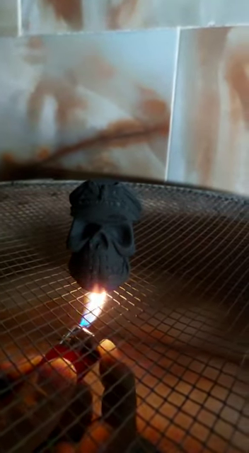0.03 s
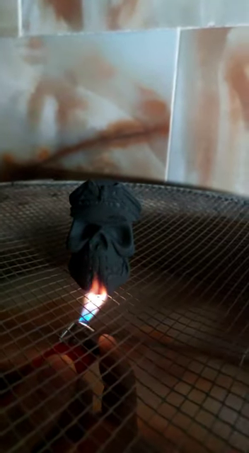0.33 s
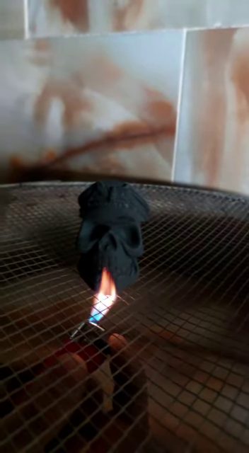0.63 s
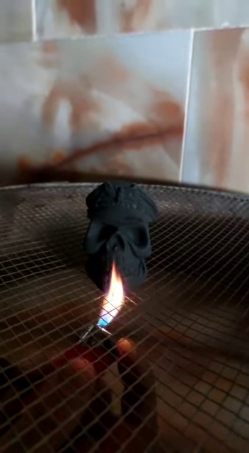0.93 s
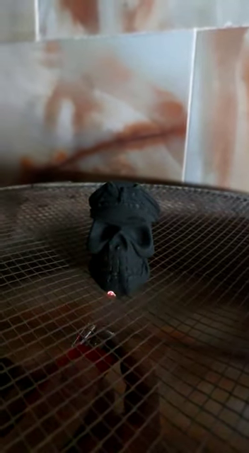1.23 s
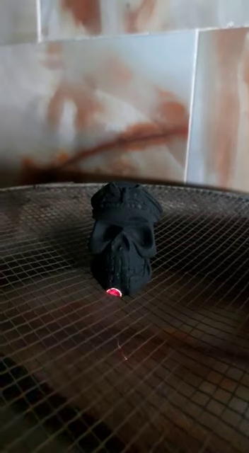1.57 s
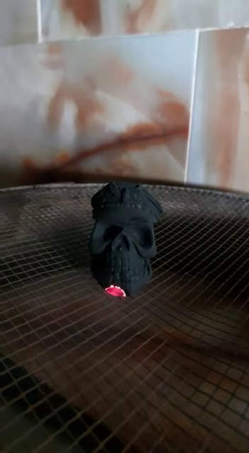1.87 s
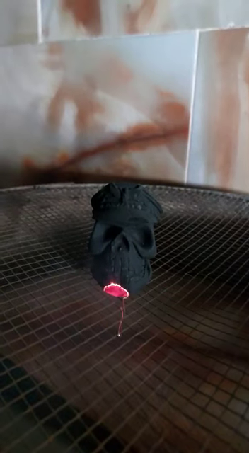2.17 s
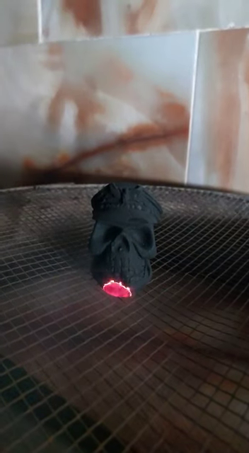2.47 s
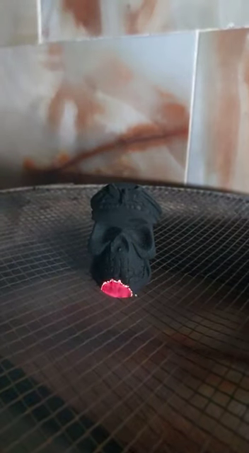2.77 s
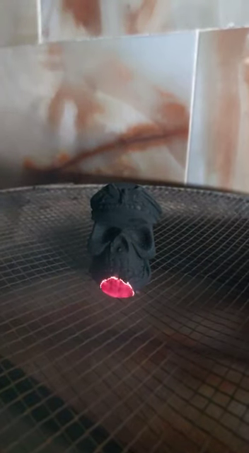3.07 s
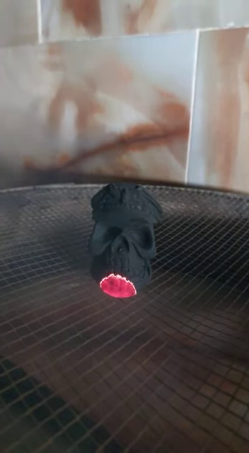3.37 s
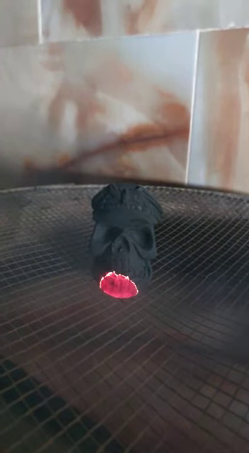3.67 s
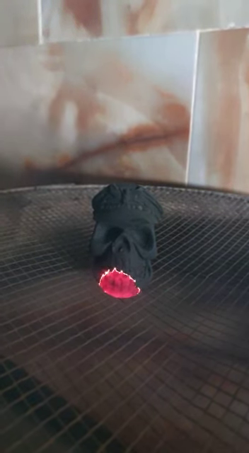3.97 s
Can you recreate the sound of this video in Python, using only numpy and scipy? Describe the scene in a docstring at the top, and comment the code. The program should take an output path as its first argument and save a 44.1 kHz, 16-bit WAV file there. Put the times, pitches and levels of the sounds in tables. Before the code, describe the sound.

Charcoal fizzes and crackles on a wire grill, catching after a jet lighter hisses softly for a second. A sharp crack, a whizzing spark and soft gas spurts come through the sizzle, close up indoors over low rumble.

```python
"""Indoors, two microphones close to a self-lighting charcoal on a wire grill, over a low room rumble.
A jet lighter hisses against the coal, which ticks once. After a second the coal catches, the lighter
stops and a glowing front fizzes across it with tiny crackles. One sharp crack follows, then a spark
whizzes away. Soft spurts of gas come through the fizz, and a smaller crack sounds near the end."""
import sys
import numpy as np
from scipy import signal
from scipy.fft import rfft, irfft
from scipy.io import wavfile

SR = 44100
rng = np.random.default_rng(int(sys.argv[2]) if len(sys.argv) > 2 else 0)


def transcribe(signal):
    """Save signal, clipped to [-1, 1], as a 16-bit WAV file at the path in sys.argv[1]."""
    frames = np.atleast_2d(signal).T
    limited = np.clip(frames, -1, 1)
    pcm = np.round(limited * 32767).astype(np.int16)
    wavfile.write(sys.argv[1], SR, pcm)


N = 176400
T = np.arange(N) / SR
HZ = np.maximum(np.arange(N // 2 + 1) * SR / N, 1)

# Echoes off the grill bowl. Each row: delay in seconds, relative level in dB.
BOWL_ECHOES = [(.00195, -24.5), (.002608, -24), (.00342, -27), (.00668, -20), (.00744, -30.5)]


def from_db(db):
    """Decibels to gain."""
    return 10 ** (np.asarray(db) / 20)


def rms_one(x):
    """Scale to unit rms."""
    return x / np.sqrt(np.mean(x ** 2) + 1e-20)


def in_time(rows):
    """The columns of a curve at every sample."""
    seconds, *columns = np.transpose(rows)
    return [np.interp(T, seconds, column) for column in columns]


def at_hz(rows):
    """The columns of a spectrum at every frequency."""
    hz, *columns = np.transpose(rows)
    return np.array([np.interp(np.log(HZ), np.log(hz), column) for column in columns])


def colour(x, rows):
    """Filter by a spectrum, falling steeply below its first point; unit rms."""
    low_cut = 1 / np.sqrt(1 + (.8 * rows[0][0] / HZ) ** 8)
    return rms_one(irfft(rfft(x) * from_db(at_hz(rows)) * low_cut, N))


def band(x, hz, kind):
    """Butterworth filter; unit rms."""
    sos = signal.butter(2, np.clip(hz, 10, .45 * SR), kind, fs=SR, output="sos")
    return rms_one(signal.sosfilt(sos, x))


def noise():
    """White noise."""
    return rng.standard_normal(N)


def drift(hz):
    """A random wander, mostly slower than hz; unit rms."""
    return rms_one(irfft(rfft(noise()) / (1 + (HZ / hz) ** 2), N))


def swell(peak_s, width_s, db):
    """A bell-shaped rise and fall."""
    return from_db(db) * np.exp(-.5 * np.clip((T - peak_s) / width_s, -10, 10) ** 2)


def grains(per_s, spread_db):
    """Random clicks of uneven size; unit rms."""
    sizes = from_db(spread_db * np.minimum(rng.exponential(1, N), 4)) * rng.choice([-1, 1], N)
    return rms_one(sizes * (rng.random(N) < per_s / SR))


def at_mics(direct):
    """Direct sound meets the two microphones out of step, the bass in step; scatter is unrelated in each."""
    # Each row: frequency in Hz, share of the power common to both microphones.
    likeness = [(100, .98), (300, .87), (550, .78), (1050, .08), (1450, .55), (1850, .15), (2200, .68),
                (3500, .68), (4600, .3), (5600, .64), (7000, .44), (9800, .24), (12000, .48), (16000, .18)]
    # Each row: frequency in Hz, phase lead of the left microphone in radians.
    left_lead = [(550, 0), (950, -1.9), (1550, -3), (2000, .7), (3000, 3.1), (3700, 3.6), (4100, 5.5),
                 (5000, 4.5), (5600, 6.1), (6800, 7.8), (7900, 7.2), (9200, 9.6), (12400, 18.2),
                 (13300, 19.2), (16000, 25)]
    alike = np.clip(at_hz(likeness), 0, .99)
    lead = np.interp(HZ, *np.transpose(left_lead)) * np.minimum(HZ / 600, 1) ** 2
    turn = np.exp(.5j * lead * np.array([[1], [-1]]))
    scattered = rfft([noise(), noise()])
    return irfft(np.sqrt(alike) * turn * rfft(direct) + np.sqrt(1 - alike) * scattered, N)


def room_rumble():
    """The low, steady rumble of the room around the grill."""
    # Each row: frequency in Hz, relative level in dB.
    spectrum = [(13, -41), (22, -31), (43, -5.5), (95, -2), (116, -12), (131, -2.5), (144, 3), (158, -7),
                (178, -10.5), (222, -15), (292, -11.5), (494, -34.5), (600, -30.5), (780, -71),
                (1320, -120)]
    return from_db(-63.5) * colour(at_mics(noise()), spectrum)


def jet_lighter():
    """A steady jet of gas that thins briefly before the thumb lets go."""
    # Each row: frequency in Hz, relative level at the left and right microphones in dB.
    spectrum = [(560, -11.5, -14.5), (1130, -15.5, -17), (1660, -16, -13.5), (2240, -7.5, -13),
                (2720, -2.5, -15), (3230, -1.5, 1), (3400, 4, 0.5), (3770, -2.5, -3.5), (5070, -6.5, -9.5),
                (7640, -8.5, -10.5), (9600, -16, -13), (11200, -8, -15), (15000, -19, -21)]
    off_s, release_s = 1.16, 0.015
    start_db, rise_db_per_s = -67.5, 0.5
    held = np.clip((off_s - T) / release_s, 0, 1)
    jet = colour(at_mics(noise()), spectrum)
    lows = irfft(rfft(jet) / (1 + (HZ / 2900) ** 8), N)
    thinning = 0.64 * swell(peak_s=0.96, width_s=0.044, db=0)
    level_db = start_db + rise_db_per_s * T + .5 * drift(hz=6.3)
    return held * from_db(level_db) * (jet - thinning * lows)


def coal_cracks():
    """Each crack is a ringing chip and a snap, both echoed by the bowl, over a dull thud."""
    # Each row: start in seconds, level in dB, pitch of the chip in Hz, then ring, snap and thud trims in dB.
    cracks = [(0.1558, -45, 12000, -8, -6, -34), (1.131, -50, 4170, -2, -3, -13),
              (1.314, -41, 6500, -8, -3, -16), (1.5483, -15.5, 11100, -0.5, -4, -40),
              (1.5507, -25, 11000, 0, -3, -30), (1.641, -37, 11700, -11, -5, -17),
              (1.919, -36, 12000, -5, -2, -34), (3.6037, -28, 5720, 4, 2.5, -14),
              (3.6062, -32, 5400, 2, 0, -4)]
    # Each row: frequency in Hz, relative level in dB.
    snap_spectrum = [(1000, -39), (2100, 3.5), (3000, -4.5), (4200, -3), (5400, -3), (7000, 7), (9000, 4),
                     (12000, 5.5), (16000, -12)]
    echo_boost_db, tail_db, tail_t60_s, pan_db = 10, -6.5, 0.1, 0.5

    def decay(start_s, db, t60_s):
        return (T > start_s) * from_db(np.maximum(db - 60 * np.maximum(T - start_s, 0) / t60_s, -300))

    snap = colour(at_mics(noise()), snap_spectrum)
    thud = band(at_mics(noise()), [250, 1800], "band")
    direct, thuds = np.zeros((2, N)), np.zeros((2, N))
    for start_s, db, hz, ring_db, snap_db, thud_db in cracks:
        chip = np.sin(2 * np.pi * hz * (T - start_s) + np.array([[1], [0]]))  # left leads by a radian
        direct += chip * decay(start_s, db + ring_db, t60_s=0.0061)
        direct += .5 * snap * decay(start_s, db + snap_db, t60_s=0.012)
        thuds += thud * decay(start_s, db + thud_db, t60_s=0.078)
    echoes = sum(from_db(db + echo_boost_db) * np.roll(direct, int(delay_s * SR), axis=1)
                 for delay_s, db in BOWL_ECHOES)
    scatter = rng.standard_normal((2, SR // 4)) * from_db(-60 * T[:SR // 4] / tail_t60_s)
    scatter = band(scatter, 7000, "low")
    tail = signal.fftconvolve(direct, scatter / np.linalg.norm(scatter[0]), axes=1)[:, :N]
    return (direct + echoes + from_db(tail_db) * tail) * from_db([[pan_db], [-pan_db]]) + thuds


def gas_spurts():
    """Flame and pockets of gas flare in short puffs, broad and soft or narrow and spitting."""
    # Each row: peak time and width in seconds, level in dB, centre in Hz, bandwidth in octaves.
    spurts = [(.335, 0.041, -75, 1220, 2), (.395, 0.013, -60, 110, 1.7), (.74, 0.23, -78, 1500, 2.1),
              (.84, 0.049, -56, 91, 1.6), (1.14, 0.014, -59.5, 1820, 2.8), (1.207, 0.016, -49.5, 127, 1.27),
              (1.204, 0.013, -57, 593, 2), (1.868, 0.043, -54.5, 770, 1.5), (2.5696, 0.004, -39, 1000, 2.6),
              (2.572, 0.0054, -45, 1770, 0.23), (2.588, 0.0077, -45.5, 310, 1.3),
              (2.588, 0.0099, -46.5, 1280, 1.9), (2.6125, 0.0031, -36, 530, 1.26),
              (2.625, 0.015, -40.5, 313, 1.3), (2.623, 0.0097, -44, 910, 1.7),
              (2.645, 0.023, -46.5, 560, 2.8), (2.886, 0.031, -48.5, 206, 1.8),
              (3.12, 0.027, -55, 271, 1.2), (3.495, 0.018, -54, 257, 2.1), (3.538, 0.028, -45.5, 1300, 3.5),
              (3.58, 0.11, -58, 250, 2), (3.606, 0.0028, -50, 1500, 2.6), (3.621, 0.028, -49.5, 616, 5),
              (3.72, 0.13, -53.5, 68, 1.02)]
    air, out = at_mics(noise()), np.zeros((2, N))
    for peak_s, width_s, db, hz, octaves in spurts:
        edges = hz * 2 ** (octaves * np.array([-.5, .5]))
        puff = band(band(air, edges, "band"), edges, "band")
        out += puff * swell(peak_s, width_s, db)
    return out


def burning_coal():
    """Countless tiny bursts fizz over rushing gas and a low draught; some stand out as crackles."""
    # Each row: frequency in Hz, relative level at the left and right microphones in dB.
    spectrum = [(220, -8, -6.5), (319, -2.5, -6), (531, 0.5, -2.5), (700, -10.5, -6.5), (880, -1.5, -8),
                (1164, -4, 0.5), (1326, -6, -7), (1740, -5, -10), (1960, -3.5, -5.5), (3000, -2, -2.5),
                (3870, -4.5, -3), (4700, -4, -9.5), (5450, -5.5, -3.5), (7660, -3, -9), (8700, -12.5, -8.5),
                (10230, -5.5, -19), (12200, -4.5, -7), (16000, -8.5, -25)]
    # Each row: frequency in Hz, relative level in dB.
    draught_spectrum = [(25, -19), (50, -4.5), (72, 5), (105, -2.5), (130, 5.5), (155, -10.5), (180, -7),
                        (260, -18), (400, -23)]
    # Vigour of the fizzing front and of the gas. Each row: time in seconds, relative level in dB.
    fizz_curve = [(1.04, -53), (1.12, -62.5), (1.17, -58.5), (1.24, -56), (1.31, -52), (1.45, -53.5),
                  (1.65, -53.5), (1.95, -50), (2.2, -46.5), (2.37, -51.5), (2.48, -46), (2.56, -49),
                  (2.78, -51.5), (2.94, -49), (3.24, -50.5), (3.42, -49), (3.58, -46.8), (3.8, -49.5),
                  (4, -48)]
    gas_curve = [(1.04, -80), (1.16, -62.5), (1.36, -56), (1.55, -55.5), (1.8, -50), (1.98, -49.5),
                 (2.25, -51.5), (2.55, -48.5), (2.72, -51.5), (2.9, -48.5), (3.22, -51.5), (3.5, -48.5),
                 (3.75, -53.5), (4, -49.5)]
    # Bright flares of the fizz. Each row: peak time and width in seconds, level in dB.
    flare_swells = [(1.34, 0.027, -63), (2.215, 0.052, -50.5), (2.47, 0.024, -48), (2.67, 0.018, -53),
                    (3.18, 0.04, -51), (3.6, 0.028, -48), (3.96, 0.022, -54)]
    catch_s, rise_s = 1.05, 0.11
    split_hz, flutter_hz, burst_share = 2140, 4.8, 0.28
    fizz_trim_db, gas_trim_db = 1.45, -1.44
    (fizz_db,), (gas_db,) = in_time(fizz_curve), in_time(gas_curve)

    bursts = np.array([grains(per_s=5000, spread_db=4.5) for _ in range(2)])
    smooth = at_mics(noise())
    grainy = at_mics(bursts[0]) + .5 * bursts[::-1]
    hiss = colour(np.sqrt(1 - burst_share) * smooth + np.sqrt(burst_share) * grainy, spectrum)
    crackle = from_db(-23) * colour(grains(per_s=14, spread_db=5.5), spectrum)
    fizz = band(hiss + crackle, split_hz, "high")
    fizz *= from_db(fizz_trim_db + fizz_db + 1.48 * drift(flutter_hz))

    rush = colour(at_mics(noise()), spectrum)
    gas = band(rush, split_hz, "low") * from_db(gas_trim_db + gas_db + 1.5 * drift(flutter_hz))
    flares = band(rush, 8500, "high") * sum(swell(*row) for row in flare_swells)
    draught = colour(at_mics(noise()), draught_spectrum)
    draught *= from_db(-55 + gas_db - np.median(gas_db) + 2 * drift(hz=25))  # follows the gas
    alight = np.clip((T - catch_s) / rise_s, 0, 1)
    return alight * (fizz + gas + flares + draught)


def flying_spark():
    """A flying ember sputters: a broken, raspy whistle that rises and falls."""
    # Each row: time in seconds, pitch in Hz, level in dB.
    flight = [(1.89, 1561, -60), (1.914, 1702, -48), (1.928, 1825, -60), (1.941, 2196, -52),
              (1.952, 2000, -72), (1.995, 1800, -59), (2.011, 1840, -45), (2.025, 1926, -54),
              (2.032, 1487, -54), (2.044, 1383, -46), (2.054, 1142, -57), (2.064, 1078, -55.5),
              (2.09, 1065, -60)]
    hz, db = in_time(flight)
    phase = 2 * np.pi * np.cumsum(hz) / SR

    def whizz(width_hz):
        return rms_one(drift(width_hz) * np.sin(phase) + drift(width_hz) * np.cos(phase))

    rasp = from_db(-4) * np.array([whizz(width_hz=330) for _ in range(2)])
    whistle = 0.87 * whizz(width_hz=34)
    flying = (T > flight[0][0]) * (T < flight[-1][0])
    return flying * from_db(db) * (whistle + rasp)


def grill_bowl(x):
    """The bowl adds short echoes, and hollow resonances and notches that differ at each microphone."""
    # Each row: centre and width in Hz, lift at the left and right microphones in dB.
    resonances = [(258, 45, 3, 4), (390, 60, -3, -3), (525, 70, 4, 4), (705, 22, 7, 7), (780, 60, -2, 0),
                  (950, 45, 4, 8), (1105, 50, 8, 0), (1175, 55, 1, 5), (1475, 60, 6, 7), (1860, 70, 0, 8),
                  (2118, 55, 3.5, 4), (2300, 70, 5, 2), (2540, 120, -4, -2), (3575, 45, 4, 4),
                  (3878, 50, 4, 4), (4144, 45, 5, 5), (5380, 150, 4, 4), (6143, 55, 4, 4)]
    echoes = 1 + sum(from_db(db) * np.exp(-2j * np.pi * HZ * delay_s) for delay_s, db in BOWL_ECHOES)
    lift_db = sum(np.array([[left], [right]]) / (1 + (2 * (HZ - hz) / width) ** 2)
                  for hz, width, left, right in resonances)
    return irfft(rfft(x) * echoes * from_db(lift_db), N)


def scene():
    """Room, lighter and coal as they reach the close pair of microphones."""
    room = room_rumble()
    fire = grill_bowl(jet_lighter() + burning_coal() + gas_spurts())
    return room + fire + coal_cracks() + flying_spark()


def record(dry):
    """The highest treble is cut steeply."""
    cutoff_hz = 15750
    return irfft(rfft(dry) / np.sqrt(1 + (HZ / cutoff_hz) ** 600), N)


dry = scene()
out = record(dry)
transcribe(out)
```